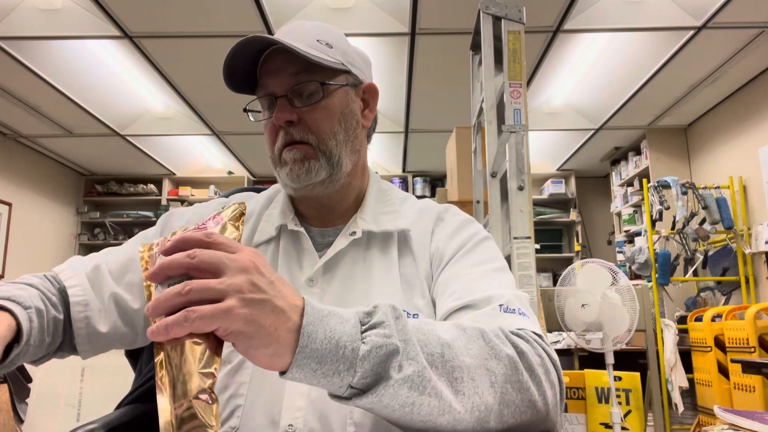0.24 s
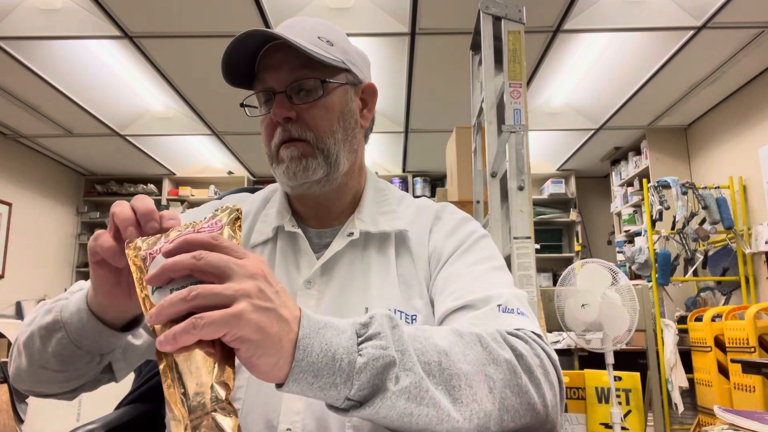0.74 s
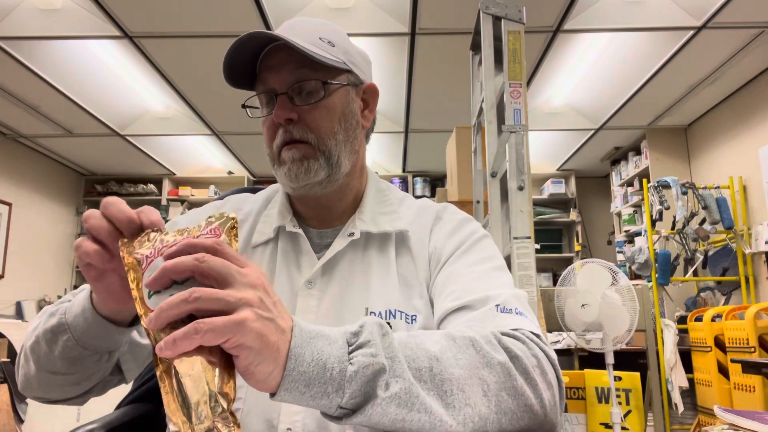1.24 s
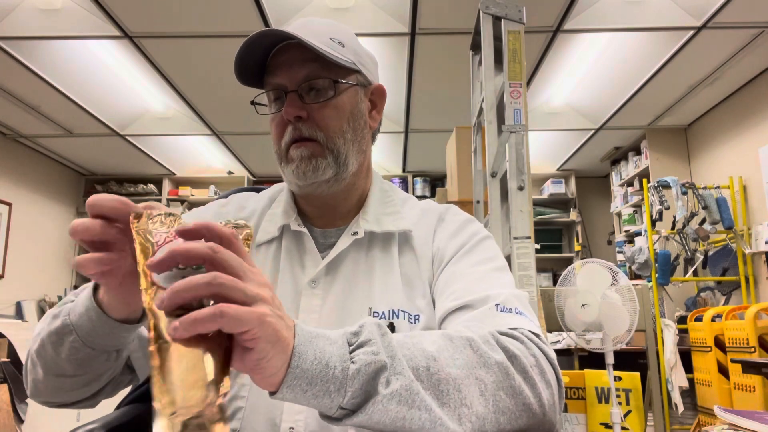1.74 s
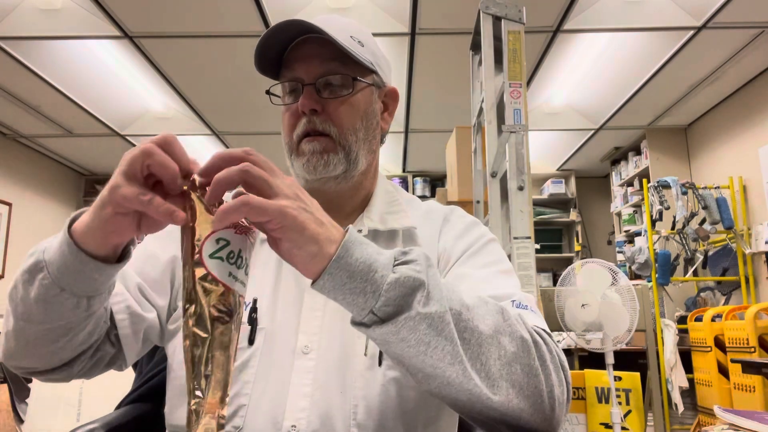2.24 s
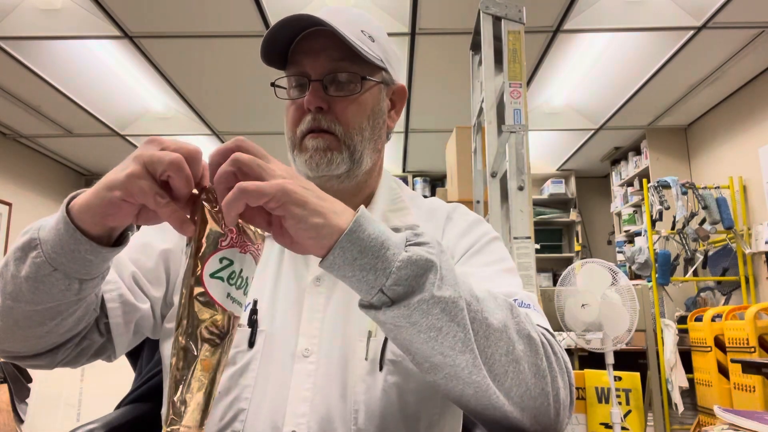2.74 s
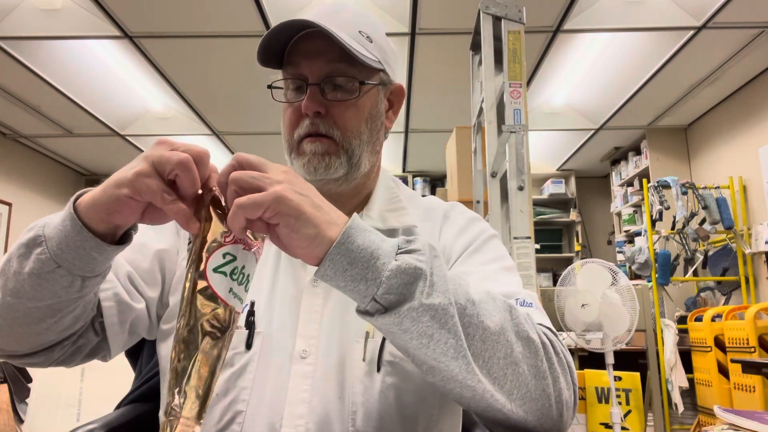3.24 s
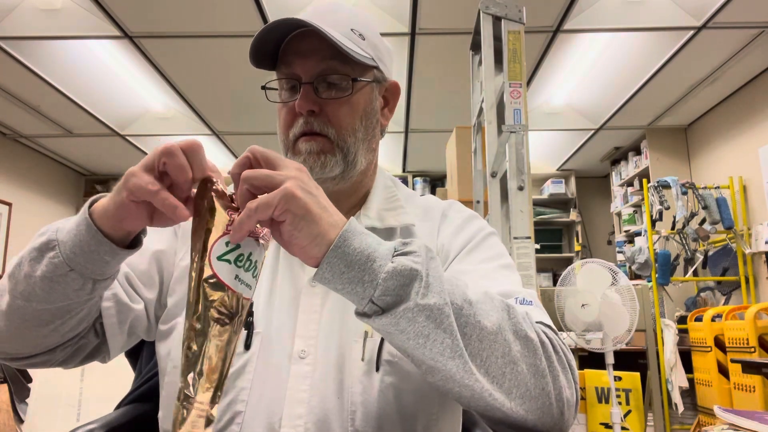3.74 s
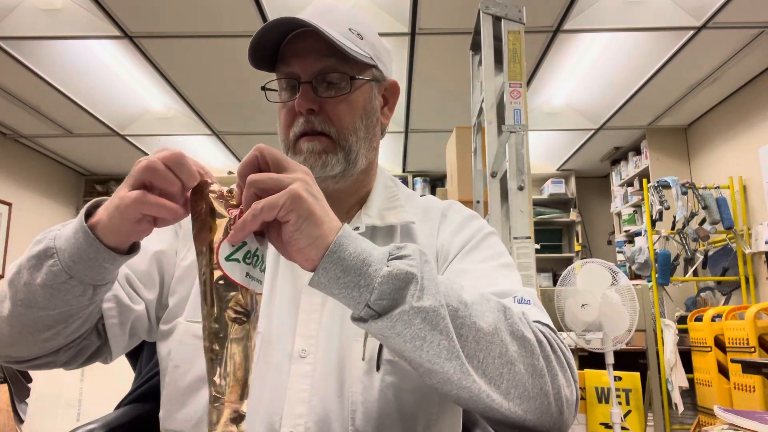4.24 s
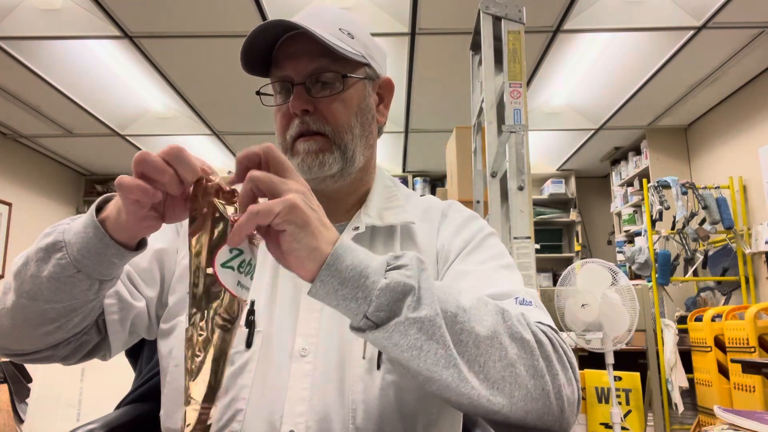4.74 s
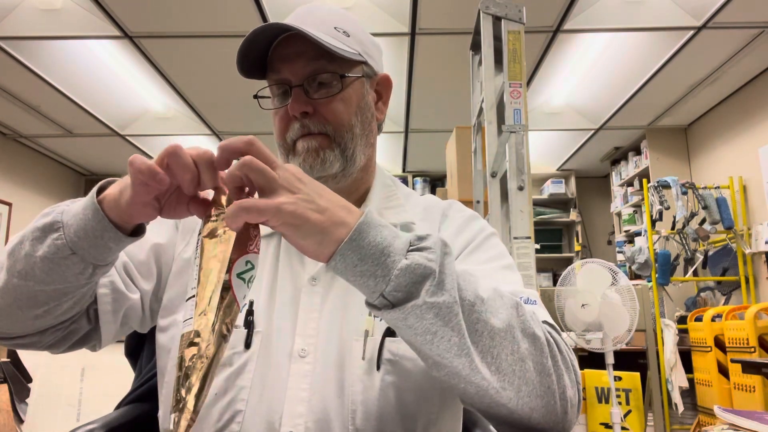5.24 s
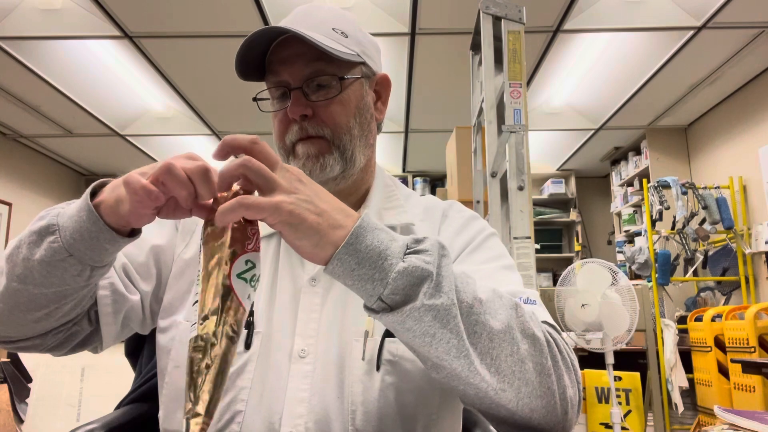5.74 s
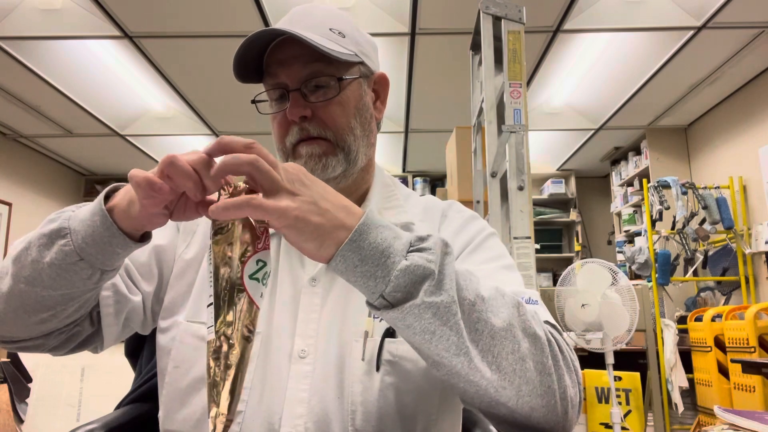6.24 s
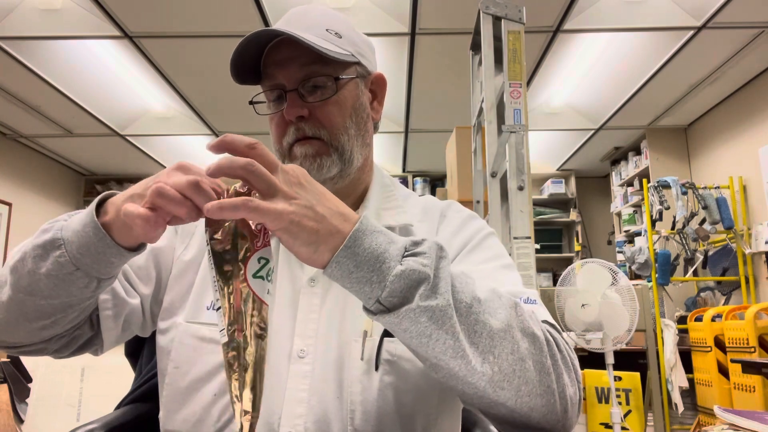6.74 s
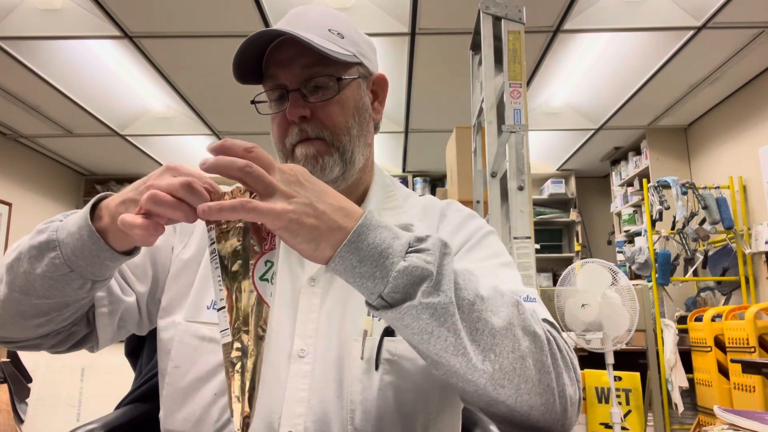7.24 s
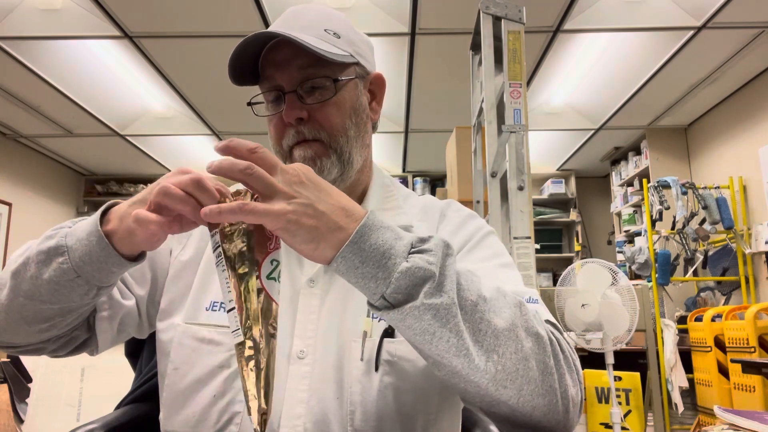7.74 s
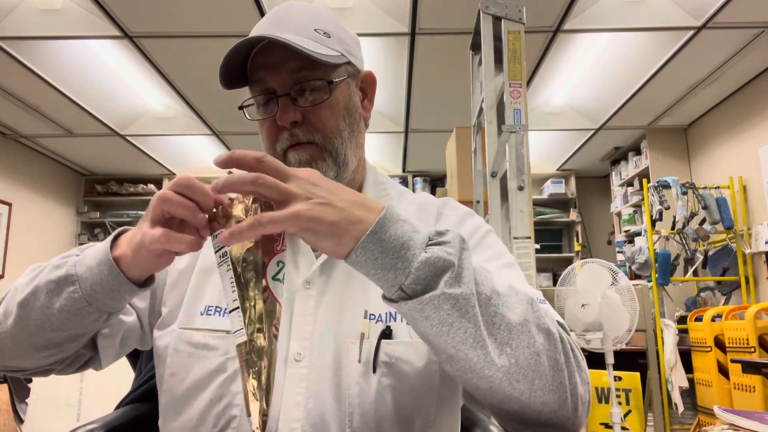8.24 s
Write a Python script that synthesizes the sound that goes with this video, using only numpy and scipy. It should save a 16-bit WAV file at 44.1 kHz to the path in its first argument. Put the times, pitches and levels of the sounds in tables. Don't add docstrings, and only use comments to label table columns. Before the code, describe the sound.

Close stereo phone pickup, short dry room. A dull double thump and clattering rattle opens, loudest of all, then a short gap of fan hum. Stiff foil film begins crinkling in clusters: bright sharp snaps, papery pops and faint sliding rustle, busiest from one to five seconds, then sparser and softer, with a few stronger pops near the end. The bag is never heard tearing open.

```python
import sys
import numpy as np
from scipy import signal
from scipy.fft import rfft, irfft, next_fast_len
from scipy.io import wavfile
from scipy.ndimage import uniform_filter1d, map_coordinates

SR = 44100
rng = np.random.default_rng(int(sys.argv[2]) if len(sys.argv) > 2 else 0)


def boost_factor(decibels):
    exponent = np.asarray(decibels, float) / 20
    return 10 ** exponent


def int16_out(signal):
    q = np.round(np.clip(np.atleast_2d(signal).T, -1, 1) * 32767)
    wavfile.write(sys.argv[1], SR, q.astype(np.int16))


N = 374409

# hz, level_db (per Hz)
VENTILATION = [(20, -9.5), (60, -22), (127, 0), (240, -17), (400, -27), (620, -25), (800, -38.5),
               (2800, -69), (6500, -46.5), (8000, -88), (13000, -82), (16500, -80)]
# hz, likeness (1 = same, below 0 = opposed)
VENTILATION_LIKENESS = [(60, 1), (130, 1), (290, 0.54), (640, -1.9), (3100, -5), (6820, -0.5),
                        (15000, -1.5)]
# pitch_hz, width_hz, level_db
FAN_LINES = [(125.9, 4.4, -60), (61, 9.9, -58), (202.4, 22, -62), (618, 4.1, -79)]

# start_s, peak_db, knock_db, click_db (both over the peak)
TOOL_CONTACTS = [(0.074, -30, -1, -13), (0.127, -49.5, 4, -13), (0.198, -39, -5, -13),
                 (0.2246, -10.5, -15.5, -15), (0.2412, -23, -9.5, -34), (0.252, -25, -5.5, -23),
                 (0.2671, -25, -4, -15.5), (0.2889, -19.5, -12, -23), (0.3001, -28, -6, -20.5),
                 (0.31, -33, -11, -19), (0.32, -28.5, -6, -19)]
# pitch_hz, level_db, t60_s
TOOL_MODES = [(1307, -0.5, 0.03), (1341, -2.5, 0.03), (1804, -3, 0.018), (2150, -6.5, 0.024),
              (2350, -6, 0.023), (3490, -16.5, 0.025)]
# start_s, level_db, pitch_hz
DESK_THUDS = [
    (0.0715, -24.5, 370),
    (0.073, -16, 185),
    (.084, -27, 94),
    (.227, -14.5, 188),
    (.237, -18, 93.5),
    (0.277, -21, 73.4),
    (0.29, -19, 109.5),
    (.326, -21.5, 89.4),
]

# hz, level_db (per Hz)
BELLY_SPECTRUM = [(150, -59.5), (300, -0.5), (450, 3), (750, -4), (1100, -34.5)]
PANEL_SPECTRUM = [(600, -20.5), (950, -9.5), (1350, -6.5), (2200, -12), (3200, -23)]
CRACK_SPECTRUM = [(1800, -10), (2700, -2), (5000, -3.5), (6500, -6.5), (7600, -14.5)]
SIZZLE_SPECTRUM = [(6300, 0), (8200, 0.5), (11500, -2), (15000, -7), (16300, -14), (17000, -41.5)]

# middle_s, length_s, strength_db, sharpness_db
STROKES = [(0.077, 0.059, -51, -1), (0.687, 0.04, -63.5, -10.5), (0.916, 0.062, -48.5, -8),
           (1.219, 0.16, -46.5, -6), (1.842, 0.1, -39.5, 0.5), (1.938, 0.016, -33.5, 2),
           (2.096, 0.99, -51.5, -4), (2.523, 0.051, -48, -5), (2.795, 0.058, -46, -5),
           (3.01, 0.14, -45, -4), (3.285, 0.26, -57, -7), (3.614, 0.065, -43.5, -6), (3.746, 0.04, -47, 1),
           (4.202, 0.12, -43.5, -1), (4.66, 0.081, -46.5, 2), (4.78, 0.17, -50, -6),
           (4.957, 0.054, -43.5, 3), (5.18, 0.097, -52, 8), (5.609, 0.099, -50, -3.5), (5.811, 0.1, -43, 5),
           (6.065, 0.16, -48, -2.5), (6.31, 0.028, -53, 9), (6.595, 0.13, -49.5, 1.5),
           (6.812, 0.065, -50, -2.5), (7.098, 0.073, -50, -0.5), (7.382, 0.19, -57, -8),
           (7.595, 0.021, -51, -12), (7.89, 0.048, -46, -7), (8.388, 1, -65, -5)]
STROKE_SHEEN = [10, -6.5, 2, 3, -2.5, 3, 7, -2, 12, 3, -11, 0, 3, 7.5, 3, -3, 2.5, 4, 1.5, 1, 7, 6.5, 1,
                8.5, 5.5, 8.5, 1.5, 2, 9.5]

# start_s, strength_db, belly_push_db (over strength), sharpness_db (over strength)
GRASP = [(0.1678, -18, -14.5, -10), (0.6, -33.5, -28, -13), (0.64, -38.5, -5, -9), (0.813, -35, -9, -3),
         (0.835, -34, -3, -15), (0.887, -27.5, -6, -13), (0.927, -36, -31, -2), (0.941, -38.5, -24, 2.5),
         (0.971, -23.5, -21, -14.5), (0.982, -30.5, -7, -6.5), (0.993, -25, -20, -15),
         (1.001, -28.5, -8, -6), (1.025, -28.5, -11, -4), (1.065, -25.5, -33, -12), (1.077, -31, -13, -14),
         (1.1304, -34, -10, -5.5), (1.192, -36, 3, -12), (1.204, -24.5, -5.5, -15.5),
         (1.216, -35.5, -21, -2), (1.244, -33, -2, -11), (1.301, -36, -24, -8.5), (1.35, -34.5, -11, -3.5),
         (1.431, -25, -12.5, -16.5)]
TURN = [(1.481, -40, -10, -10), (1.504, -33.5, -7, -19), (1.52, -29.5, -15, -15), (1.581, -47, 2.5, -15.5),
        (1.6055, -29, -11.5, -2), (1.611, -30, -6.5, -10), (1.674, -35, -12, -4.5), (1.758, -34, -1.5, -15),
        (1.769, -43.5, -19, 0), (1.835, -27, -13, -9), (1.869, -34.5, -29, 5), (1.898, -32, -8, -3.5),
        (1.929, -35.5, -9, -10), (1.951, -30, -41, -8), (2.287, -38.5, -5.5, -20),
        (2.395, -30.5, -12.5, -19.5), (2.569, -24.5, -9, -2), (2.607, -38, -23, -11),
        (2.7057, -20, -15, -12), (2.743, -28.5, -38, -18.5), (2.767, -21.5, -16, -14),
        (2.772, -32.5, -11, -11), (2.781, -37.5, -5, 3), (2.792, -22, -22, -15.5), (2.815, -32, -14, -8.5),
        (2.842, -24.5, -12.5, -7)]
PULL = [(2.96, -33, -34, -20), (2.971, -28, -5, -4), (2.983, -21, -13.5, -14), (3.003, -39, -16, -5.5),
        (3.021, -35, -6, 0), (3.033, -22.5, -17, 1), (3.08, -30, -27, -10), (3.112, -47, -12, -10),
        (3.143, -33, -11.5, -9), (3.161, -34, -15, -11), (3.173, -26, -18, -11), (3.186, -33.5, -19, 5.5),
        (3.234, -37, -22, 2), (3.305, -51, -10, 5), (3.355, -36, 1, -11.5), (3.395, -35, -5.5, -8),
        (3.413, -31, -3.5, -6), (3.624, -34.5, -34, -10.5), (3.824, -27, -17, -19.5),
        (3.873, -38, -12, -13), (3.898, -24, -19, -11), (4.026, -27, -13, -13), (4.035, -23.5, -6.5, -8),
        (4.102, -35, -16, -7.5), (4.36, -41.5, -29, 7.5)]
PRY = [(4.5, -45.5, -13, 11.5), (4.537, -24, -16, -44), (4.555, -46, -3, 6.5), (4.582, -25.5, -3.5, -5),
       (4.732, -37, -8.5, -9), (4.753, -39, -13, 1.5), (4.811, -32, -5, 2), (4.864, -45, -6, 5),
       (4.939, -48, -8, -8.5), (4.961, -26.5, -14.5, 2), (4.966, -22.5, -13, -8.5), (5.011, -38.5, -9, -27),
       (5.153, -33.5, -10.5, -8), (5.165, -30, -12, 1), (5.212, -23.5, -9.5, -14.5),
       (5.249, -35.5, -2.5, -3), (5.255, -29.5, -4.5, -11.5), (5.287, -32.5, -8.5, -18),
       (5.366, -45, -8.5, -12), (5.418, -24.5, -3.5, -19), (5.429, -41, 0, -7), (5.45, -30, 1.5, -22.5),
       (5.512, -37.5, -7, -1), (5.575, -37, -30, -6.5), (5.689, -40, 0.5, -25), (5.706, -35.5, -2, -29),
       (5.724, -37, 2.5, -22), (5.741, -50, 0, 5.5)]
SPREAD = [(5.776, -31.5, -17, -20), (5.801, -39.5, -2, 6.5), (5.895, -30, -2.5, -18),
          (5.935, -59.5, -16, 12), (6.195, -39, -1.5, -2.5), (6.418, -33.5, -6, 3),
          (6.552, -35.5, -1, -0.5), (6.6, -34.5, -2.5, 5), (6.668, -24.5, -10.5, -7.5), (6.783, -42, 0, -1),
          (6.807, -38, 4, 5), (7.028, -35, -6, -13), (7.089, -47, -16, -0.5), (7.109, -36, -3.5, -9.5),
          (7.139, -29.5, -13.5, -8), (7.165, -28.5, -13, -12.5), (7.306, -40.5, -28, -23),
          (7.448, -42.5, -2, -5.5), (7.59, -32.5, -8.5, -14.5), (7.619, -37.5, -2, -4),
          (7.648, -33.5, -12, -10.5), (7.725, -41.5, -18, 4.5), (7.799, -17, -16.5, -26.5),
          (7.869, -34, -26, -17), (7.913, -37, 0, -12.5), (8.082, -23, -18.5, -14), (8.1, -30, -24, -21),
          (8.141, -21.5, -27, -18.5), (8.356, -41.5, -12, -36), (8.451, -37.5, -22.5, -16.5)]
SIZZLE_UNDER_CRACK = [6.2, 7, 7.8, 6.7, 8.4]
# start_s, strength_db
FOIL_TICKS = [(0.9843, -27), (0.9705, -34), (1.1304, -34), (1.2047, -32), (1.4375, -26), (2.4912, -37.5),
              (2.5684, -26.5), (2.707, -24.5), (2.8155, -39), (2.842, -25), (2.9716, -27), (2.9846, -15.5),
              (3.032, -25), (3.14, -29.5), (4.006, -39), (4.2892, -27.5), (4.32, -42), (5.1647, -30),
              (5.2143, -36), (7.0654, -45), (7.1635, -39), (7.915, -50), (8.143, -32)]
# start_s, level_db, pitch_hz
PATCH_RINGS = [(0.1687, -19.5, 1780), (0.8885, -36, 1270), (0.9269, -33, 1636.0), (0.9403, -31, 1701.0),
               (0.97, -28, 1716), (0.9932, -34, 1140), (1.0007, -41, 850), (1.0252, -34, 2280),
               (1.0663, -34, 1320), (1.078, -35, 860), (1.131, -33, 1800), (1.2051, -27.5, 1700),
               (1.4302, -33, 2290), (1.6081, -37.5, 1680), (1.8373, -27.5, 2240), (1.8693, -24, 1760),
               (1.9496, -33, 1630), (2.3957, -36.5, 1050), (2.5679, -32, 1175), (2.7054, -33, 2230),
               (2.7667, -31, 1110), (2.7926, -35, 1170), (2.8156, -35.1, 1701.0), (2.842, -30.5, 1260),
               (2.9608, -38, 2131.0), (2.9725, -29, 1600), (2.9837, -29, 750), (3.0334, -31, 1330),
               (3.174, -28, 1680), (3.3945, -30.5, 1320), (3.4125, -33, 1300), (3.8248, -32, 1230),
               (3.8975, -35, 1340), (4.0262, -30.5, 1100), (4.0353, -27, 1280), (4.5386, -29.5, 1005),
               (4.5823, -36, 1356.0), (4.8114, -40, 1340), (4.9601, -27.5, 1346), (5.1648, -38, 1020),
               (5.2144, -30.5, 1110), (5.4195, -26, 1340), (5.4508, -31.5, 1320), (5.8964, -31, 1094),
               (6.6, -33, 2207.0), (6.6678, -29, 1780), (6.809, -39, 1141.0), (7.1388, -36.5, 1378.0),
               (7.1634, -36, 1060), (7.7988, -26, 954), (8.0811, -28, 1760), (8.142, -20.5, 1790)]
# start_s, level_db, pitch_hz
FOLD_RINGS = [(0.8893, -31.5, 2310), (0.97, -26, 4230), (1.2159, -28.5, 4700), (1.606, -33.5, 2360),
              (1.8693, -25.5, 2390), (1.8975, -35, 2340), (2.5676, -23.5, 4660), (2.7068, -28, 4930),
              (2.842, -26.5, 3080), (2.9605, -33, 3080), (2.9712, -30, 5630), (2.9837, -20, 5700),
              (3.0331, -19, 4870), (3.174, -34, 2240), (3.1888, -24, 4630), (3.2337, -23, 5530),
              (3.8243, -29.5, 3270), (3.8978, -25, 3190), (4.3606, -24.5, 4820), (4.499, -28.5, 3210),
              (4.5382, -38, 2350), (4.5821, -22, 6500), (4.8111, -28, 5103.0), (4.9607, -32, 4630),
              (5.1646, -28.5, 5160), (5.2137, -30, 5700), (6.4177, -32, 4750), (6.599, -26, 6360),
              (6.6683, -27, 3270), (7.1386, -32.7, 2730), (8.0815, -31, 3080)]
# start_s, level_db, pitch_hz
PINCHES = [(0.7338, -49.5, 2350), (0.8823, -41, 1590), (0.915, -40, 1722.0), (1.3275, -39, 1722.0),
           (1.3945, -46, 1630), (1.579, -46, 1720), (1.5945, -45, 1230), (1.644, -44, 1010),
           (1.753, -51, 2336.0), (2.076, -42, 1658.0), (2.287, -39, 1590), (2.4806, -50, 1490),
           (2.5512, -45, 1670), (2.875, -44, 2077.0), (3.1115, -43, 1733.0), (3.3454, -48, 2200),
           (3.5494, -45, 1630), (3.732, -45, 1302.0), (3.967, -53, 1390), (4.0169, -36, 2410),
           (4.3207, -44, 3900), (4.449, -43.5, 2357.0), (4.4827, -58, 1690), (5.1867, -40, 1733.0),
           (5.341, -49, 1421.0), (6.0976, -52, 1310), (6.1161, -45, 1080), (6.4805, -48, 1430),
           (6.6998, -45, 3714.0), (6.7207, -47, 1410.0), (7.0894, -42, 3133.0), (7.1157, -47, 1000),
           (7.1582, -37, 1798.0), (7.3762, -49, 2020), (7.4925, -52.6, 2702.0), (7.5748, -47, 970),
           (7.601, -43, 1050), (7.886, -55, 1500), (7.9599, -44, 1170), (8.098, -40, 1250),
           (8.133, -41, 1120), (8.4559, -46, 1260)]

# hz, left_lead_rad
PORT_LEAD = [(430, .2), (600, 1.9), (1100, -.4), (1650, 1), (2200, .1), (4800, 0), (6800, -2.4),
             (7800, -2.8), (12000, 0), (15800, 2)]
# hz, likeness
NEAR_LIKENESS = [(400, 0.87), (700, 0.55), (1200, 0.63), (3000, 0.46), (6000, 0.074), (7000, 0.51),
                 (11000, 0.94)]
# hz, t60_s
ROOM_DECAY = [(200, 0.26), (2000, 0.21), (10000, 0.15)]


def unit(x):
    return x / np.sqrt(np.mean(x ** 2) + 1e-20)


def along(points, hz):
    f, v = np.transpose(points)
    return np.interp(np.log(hz + 1), np.log(f + 1), v)


def filtered(x, response):
    m = next_fast_len(N + 8192)
    return irfft(rfft(x, m) * response(np.fft.rfftfreq(m, 1 / SR)), m)[..., :N]


def wobble(rate):
    knots = rng.standard_normal(int(N * rate / SR) + 4)
    return map_coordinates(knots, [np.arange(N) * rate / SR], order=1)


def placed(times, rows):
    at = np.round(np.asarray(times) * SR).astype(int)[:, None] + np.arange(rows.shape[1])
    return np.bincount(at.ravel(), rows.ravel(), N + SR)[:N]


def tones(rows, cycles, rise):
    s, db, hz = np.transpose(rows)[..., None]
    t = np.arange(int(1.5 * cycles * SR / hz.min())) / SR
    decay = boost_factor(db - 60 * t * hz / cycles)
    return placed(s[:, 0], decay * np.sin(2 * np.pi * hz * t) * (1 - np.exp(-t / rise)))


def bursts(times, db, rise, t60, ragged_db, creep_db=-14):
    t = np.arange(-300, 1100) / SR
    life = t60 * boost_factor(5.5 * np.clip(rng.standard_normal((len(times), 1)), -2, 1))
    shocks = np.repeat(rng.standard_normal((len(times), 28)), 50, axis=1)
    shocks = shocks * np.minimum(np.abs(t) / 0.002, 1)
    after = np.maximum(t, 0)
    body = boost_factor(-60 * after / life)
    tip = 2.25 * boost_factor(-60 * after / life * 6.1)
    shape = (1 - np.exp(-after / rise)) * (body + tip)
    shape = shape / shape.max(axis=1, keepdims=True)
    creep = boost_factor(creep_db - 60 * np.abs(t) / 0.028)
    shape = boost_factor(db)[:, None] * (shape + creep) * boost_factor(ragged_db * shocks)
    pair = shape * rng.standard_normal((2,) + shape.shape)
    pair *= np.linalg.norm(shape, axis=1, keepdims=True) / np.linalg.norm(pair, axis=2, keepdims=True)
    return np.array([placed(times + t[0], rows) for rows in pair])


def air():
    def mid_side(hz):
        turn = np.arccos(np.clip(along(VENTILATION_LIKENESS, hz), -1, 1)) / 2
        return boost_factor(along(VENTILATION, hz)) * [np.ones(len(hz)), np.tan(np.minimum(turn, 1.3))]

    def fan_lines(hz):
        return sum(boost_factor(db) * np.sqrt(SR / np.pi / width_hz) / (1 + ((hz - line_hz) / width_hz) ** 2)
                   for line_hz, width_hz, db in FAN_LINES)

    mid, side = filtered(rng.standard_normal((2, N)), mid_side)
    noise = boost_factor(-53) * np.array([mid + side, mid - side]) / np.std(mid)
    fan_side = 0.12 * np.array([[1], [-1]]) * rng.standard_normal(N)
    fan = filtered(rng.standard_normal(N) + fan_side, fan_lines)
    t = np.arange(N) / SR
    lamp = boost_factor([[-76], [-84]]) * np.sin(2 * np.pi * 6422 * t + 0.76 * wobble(27))
    buzz = boost_factor(-58) * np.sin(2 * np.pi * 120.5 * t + 1.2 * wobble(4))
    return noise + fan + lamp + buzz


def ringing(times, db, modes, scatter_db):
    t = np.arange(SR // 4) / SR
    hz, level, t60 = np.transpose(modes)[..., None]
    decay = boost_factor(level - 60 * (t / t60) ** 1.68)
    rings = decay * np.sin(2 * np.pi * hz * t) * (1 - np.exp(-t / 0.0016))
    blows = boost_factor(np.asarray(db)[:, None] + scatter_db * rng.standard_normal((len(times), len(modes))))
    return placed(times, blows @ rings)


def tool():
    s, db, knock_db, click_db = np.transpose(TOOL_CONTACTS)
    ring = ringing(s, db - 8, TOOL_MODES, scatter_db=4) * boost_factor(2.4 * wobble(259.8))
    boom = tones(DESK_THUDS, cycles=6.5, rise=0.002)
    rattle = [bursts(s, db + knock_db, rise=0.0011, t60=0.066, ragged_db=1.5),
              bursts(s, db - 13, rise=0.0004, t60=0.025, ragged_db=2),
              bursts(s, db + click_db - 6, rise=0.0011, t60=0.096, ragged_db=5.5),
              bursts(s, db + click_db - 21.5, rise=0.00028, t60=0.013, ragged_db=9.5)]
    return ring + boom, rattle


def strokes(db):
    s, length = np.transpose(STROKES)[:2, :, None]
    t = np.arange(0, N + 441, 441) / SR
    away = (t - s) / length
    slope_db = np.where(away < 0, 14, 9)
    gain = boost_factor(db[:, None] - slope_db * np.abs(away))
    return np.interp(np.arange(N) / SR, t, np.linalg.norm(gain, axis=0))


def swarm(count, spread_db, t60):
    draws = rng.random((count, 2))
    sizes = boost_factor(-spread_db * np.log(draws[:, 1] + 0.022))
    ticks = np.bincount((draws[:, 0] * N).astype(int), sizes, N)
    return unit(signal.lfilter([1], [1, -boost_factor(-60 / (t60 * SR))], ticks))


def rustle():
    crack_db, sharp_db = np.transpose(STROKES)[2:]
    panel_db = crack_db - sharp_db
    pressure_db = crack_db - crack_db.mean()
    sizzle_db = crack_db - 15.5 + 0.2 * pressure_db + 0.093 * sharp_db + STROKE_SHEEN
    shared = swarm(count=3500, spread_db=5.5, t60=0.063)
    parts = []
    for level_db in (panel_db - 8.5, panel_db - 10, crack_db - 6.5, sizzle_db + 0.5):
        own = swarm(count=1200, spread_db=13.5, t60=0.0073)
        grain = unit((0.78 * shared + 0.5 * own + 0.61) * boost_factor(2.8 * wobble(22)))
        parts.append(strokes(level_db) * grain * rng.standard_normal((2, N)))
    return parts


def ringless(s, rings):
    nearest_s = np.abs(s[:, None] - np.transpose(rings)[0]).min(axis=1)
    return -3 * (nearest_s < 0.004)


def snaps():
    moves = (GRASP, TURN, PULL, PRY, SPREAD)
    s, panel_db, push_db, sharp_db = np.transpose(sum(moves, []))
    under_db = np.repeat(SIZZLE_UNDER_CRACK, [len(move) for move in moves])
    crack_db = panel_db + sharp_db
    sizzle_db = crack_db - under_db + 0.25 * sharp_db
    lasts = boost_factor(-0.14 * (sharp_db - sharp_db.mean()))[:, None]
    tick_s, tick_db = np.transpose(FOIL_TICKS)
    ticks = bursts(tick_s, tick_db, rise=0.00017, t60=0.0044, ragged_db=1, creep_db=-44)
    spikes = placed(s + 0.0004, boost_factor(crack_db + 10.5)[:, None]) * [[1], [0]]
    belly = bursts(s + 0.0017, panel_db + push_db + 0.5, rise=0.0014, t60=0.044, ragged_db=1.5)
    panel = bursts(s + 0.00065, panel_db - 5.5 + ringless(s, PATCH_RINGS),
                   rise=0.00043, t60=0.051, ragged_db=1)
    crack = bursts(s + 0.0001, crack_db + 1.5 + 0.48 * ringless(s, FOLD_RINGS),
                   rise=0.00017, t60=0.036 * lasts, ragged_db=3.5, creep_db=-18)
    sizzle = bursts(s, sizzle_db + 6, rise=0.00018, t60=0.011 * lasts, ragged_db=10.5, creep_db=-30)
    return [belly, panel, crack + boost_factor(-8.5) * ticks + spikes, sizzle + ticks]


def radiated(pair, spectrum):
    lowest_hz, highest_hz = spectrum[0][0], spectrum[-1][0]
    skirted = [(lowest_hz / 2, -70)] + spectrum + [(highest_hz * 2, -70)]

    def response(hz):
        gain = unit(boost_factor(along(skirted, hz)))
        turn = np.arccos(np.clip(along(NEAR_LIKENESS, hz), 0, 1)) / 2
        mix = np.array([[np.cos(turn), np.sin(turn)], [np.cos(turn), -np.sin(turn)]])
        return gain * mix * np.exp(1j * along(PORT_LEAD, hz) * [[[0.5]], [[-0.5]]])

    return filtered(pair, response).sum(axis=1)


def crinkle(count):
    draws = rng.random((count, 2))
    _, _, crack_db, sharp_db = np.transpose(STROKES)
    stroke_gain = strokes(crack_db - 0.76 * sharp_db)[(draws[:, 0] * N).astype(int)]
    size_db = -4 * np.log(draws[:, 1] + 0.031)
    db = 20 * np.log10(stroke_gain) + size_db - 7
    hz = np.clip(2180 * np.exp(0.583 * rng.standard_normal(count)), 800, 6800)
    return tones(np.transpose([draws[:, 0] * N / SR, db, hz]), cycles=22.6, rise=0.0004)


def patches():
    s, db, _ = np.transpose(PINCHES)
    rings = boost_factor(2.5) * tones(PATCH_RINGS, cycles=29.3, rise=0.00029)
    rings += boost_factor(1.5) * tones(FOLD_RINGS, cycles=38.6, rise=0.00018)
    rings += boost_factor(3) * tones(PINCHES, cycles=27, rise=0.00011)
    ticks = bursts(s, db - 6.5, rise=0.00022, t60=0.0057, ragged_db=6)
    rings += crinkle(count=1800)
    at_ports = filtered(rings, lambda hz: np.exp(1j * along(PORT_LEAD, hz) * [[0.5], [-0.5]]))
    return at_ports + radiated(ticks, CRACK_SPECTRUM)


def crumpled(x, patchy_db):
    z = signal.stft(x, nperseg=512)[2]
    field = uniform_filter1d(rng.standard_normal(z.shape[1:]), size=9, axis=0)
    field = uniform_filter1d(field, size=7, axis=1)
    gain = boost_factor(patchy_db * unit(field))
    return signal.istft(z * unit(gain), nperseg=512)[1][:, :N]


def room(x):
    hz, t, z = signal.stft(rng.standard_normal(SR // 2), SR, nperseg=256)
    decay = boost_factor(-60 * t / along(ROOM_DECAY, hz)[:, None])
    tail = signal.istft(z * decay, SR, nperseg=256)[1]
    late = np.pad(x, ((0, 0), (150, 0)))
    return signal.fftconvolve(late, tail[None] / np.linalg.norm(tail), axes=1)[:, :N]


def scene():
    ring, rattle = tool()
    spectra = (BELLY_SPECTRUM, PANEL_SPECTRUM, CRACK_SPECTRUM, SIZZLE_SPECTRUM)
    layers = zip(spectra, snaps(), rustle(), rattle)
    near = sum(radiated(snap + rub + tick, part) for part, snap, rub, tick in layers)
    film = crumpled(near, patchy_db=2.4) * boost_factor([[0.4], [-0.4]])
    rings = patches()
    ring = filtered(ring, lambda hz: boost_factor([[1.5], [-1.5]]) * np.exp(0.4j * np.log1p(hz / 600) * [[1], [-1]]))
    reverb = boost_factor(-12.5) * room(film + boost_factor(-1.5) * rings + boost_factor(-2.5) * ring)
    return film + rings + ring + reverb + air() * boost_factor([[0.9], [-0.9]])


def band_limit(x):
    return signal.sosfilt(signal.butter(12, 16750, fs=SR, output="sos"), x)


def record(dry):
    band = filtered(dry, lambda hz: 1j * hz / (45 + 1j * hz) * (hz < 16750))
    return band_limit(band)


dry = scene()
out = record(dry)
int16_out(out)
```